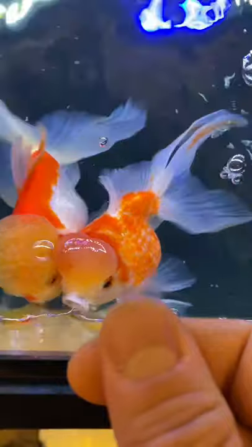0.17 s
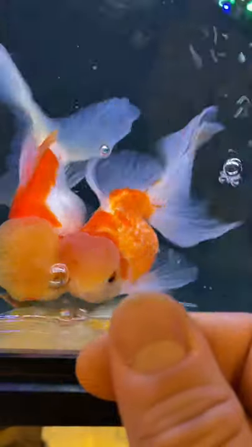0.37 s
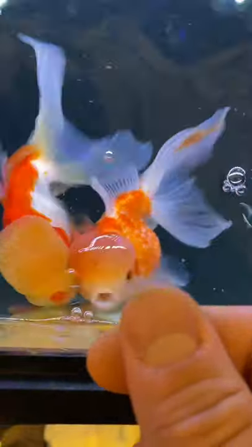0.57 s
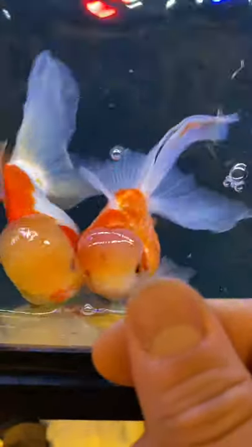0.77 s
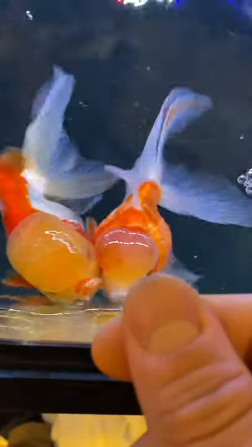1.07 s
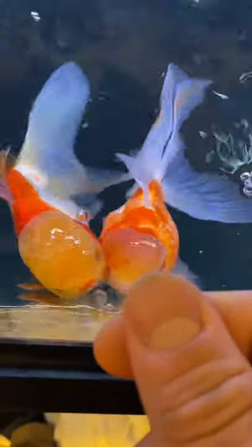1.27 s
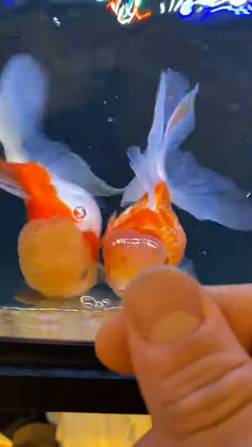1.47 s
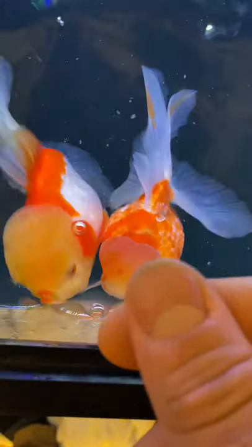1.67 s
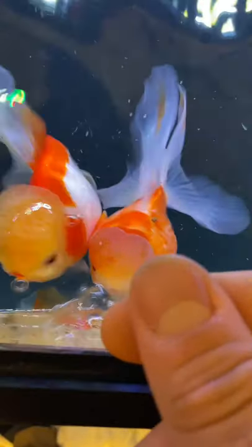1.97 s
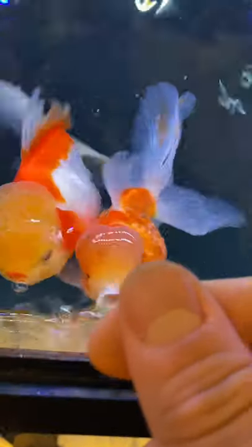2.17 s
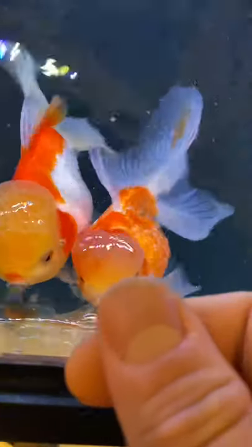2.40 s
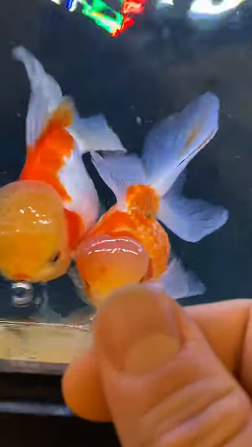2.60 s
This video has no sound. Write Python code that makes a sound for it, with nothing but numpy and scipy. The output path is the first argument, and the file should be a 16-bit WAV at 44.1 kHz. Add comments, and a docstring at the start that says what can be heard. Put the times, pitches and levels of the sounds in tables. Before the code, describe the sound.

Steady low throb of a fish tank pump, gently rushing water, tiny bubbles fizzing and popping

```python
"""A pump thumps thirty strokes a second and buzzes in its housing: an aquarium indoors.
Water runs back into the tank as a rush of noise and tiny bubbles; larger bubbles pop at the surface.
Thump and buzz are sums of stroke multiples, the rush is shaped noise, bubbles are short rising sines
and bursting films are noise ticks. Two microphones stand a few centimetres apart; the pops
reach the left one first."""
import sys
import numpy as np
from scipy import signal
from scipy.fft import rfft, irfft, next_fast_len
from scipy.io import wavfile

SR = 44100
rng = np.random.default_rng(int(sys.argv[2]) if len(sys.argv) > 2 else 0)


def transcribe(signal):
    """Save signal, clipped to [-1, 1], as a 16-bit WAV file at the path in sys.argv[1]."""
    frames = np.atleast_2d(signal).T
    limited = np.clip(frames, -1, 1)
    pcm = np.round(limited * 32767).astype(np.int16)
    wavfile.write(sys.argv[1], SR, pcm)


def boost(x):
    """Linear amplitude factor 10**(x/20) for a level x in decibels (scalar or array-like)."""
    u = np.asarray(x, float) / 20
    return 10 ** u


N = 120834

# multiples of the pump stroke: multiple, level_db (added to PUMP_DB)
PUMP_MULTIPLES = [(1, 2), (2, -2), (3, -7), (5, -13), (6, -28), (7, -25.5), (8, -40.5), (9, -10.5)]
# housing buzz at each microphone: multiple of the stroke, left_rms_db, right_rms_db
BUZZ_MULTIPLES = [(21, -63, -68), (28, -69, -72), (29, -68, -74), (30, -69, -78), (37, -67, -74),
                  (39, -62, -75), (43, -79, -68), (50, -72, -71), (51, -72, -72)]
# spectrum of the rumble and rush before it flickers: pitch_hz, level_db_per_hz
FLOW_SPECTRUM = [(25, -83), (45, -68.5), (75, -65), (105, -61.5), (135, -72), (195, -70), (255, -69.5),
                 (320, -82), (720, -82.5), (800, -90), (1600, -91), (3000, -92.5), (5300, -97.5),
                 (6500, -102.5), (8000, -101), (9500, -100)]
# share of the flow that is unrelated between the channels, held at 0 dB or less: pitch_hz, share_db
DIFFUSE_SHARE = [(30, -51), (250, -5.5), (1000, -5), (2000, -0.5), (4150, -27.5), (4300, -25), (5500, -35),
                 (5750, -5.5), (8200, 6), (8700, -29.5)]
# phase by which the right channel trails the left for flow and fizz; from 4.3 to 5.5 kHz
# the channels are opposite: pitch_hz, trail_rad
RIGHT_TRAIL = [(0, 0), (900, .3), (4150, 2.6), (4300, np.pi), (5500, np.pi), (5750, 3.7), (8800, 2 * np.pi)]
# treble contour, whose swing about its mean drives the fizz rate: time_s, level_db
TREBLE_CONTOUR = [(0.1, -65.5), (2.56, -64), (2.7, -70)]
# tiny bubbles: rate_per_s (before clumping), lowest_hz, highest_hz, level_db (faintest), size_spread_db
FIZZ_KINDS = [(50, 500, 2500, -59, 4.0), (170, 2500, 9500, -58, 5.0)]
# larger bubbles: start_s, peak_db, pitch_hz (at the start)
POP_EVENTS = [(.217, -43, 1140), (.243, -43, 4800), (.645, -39, 5300), (.6485, -38, 5300),
              (.6641, -41, 9350), (.7251, -44, 8960), (.736, -38, 1300), (.7375, -35, 750),
              (.741, -36, 920), (.7412, -39, 2200), (.743, -37, 1070), (.745, -42, 3600), (.756, -38, 6300),
              (.7575, -44, 3050), (.766, -44, 4300), (.820, -44, 2900), (.825, -38, 2900),
              (.862, -40, 3300), (1.128, -43, 1420), (1.1665, -47, 8610), (1.1877, -42, 8270),
              (1.199, -38, 570), (1.2449, -39, 6720), (1.514, -38, 2000), (1.514, -42, 3850),
              (1.661, -45, 2700), (1.661, -36, 1050), (1.661, -33, 1390), (1.6613, -42, 6720),
              (1.676, -42, 950), (1.7731, -42, 5680), (1.8015, -32, 480), (1.8289, -44, 7400),
              (1.907, -41, 2950), (1.907, -36, 2450), (1.9292, -38, 5680), (2.5134, -44, 8270)]
# soft low gurgles that ring longer: start_s, peak_db, pitch_hz (at the start)
GURGLE_EVENTS = [(.235, -36, 100), (.295, -48, 410), (.91, -48, 485)]
# films that burst with a broad tick: start_s, rms_db (before the decay), lowest_hz, highest_hz
TICK_EVENTS = [(.217, -37, 800, 2600), (.4652, -41, 5500, 9700), (.5578, -43, 3800, 5800),
               (.7555, -39, 3000, 8500), (.8245, -41, 2000, 4500), (1.380, -41, 6500, 9700),
               (1.4845, -40, 4200, 6300), (1.5145, -39, 1800, 7300), (1.9938, -34, 7000, 9700),
               (2.119, -42, 6500, 9700), (2.1325, -33, 3500, 6800), (2.3245, -42, 4500, 7500),
               (2.4724, -35, 4400, 6200), (2.5524, -38, 5000, 7500)]

STROKE_HZ, STROKE_S = 30, .0497   # pump rate; moment near which one stroke peaks
PUMP_DB, PUMP_WAVER_DB = -37.5, 0.5   # rms reference for the multiples; their slow waver
HUM_SPREAD_RAD = 0.0069   # left-right phase, times the multiple squared
LOW_LAG_RAD = .65   # the two lowest multiples trail the stroke
BUZZ_COMB_DB, BUZZ_WAVER_DB = -77.5, 1.8   # rms of each other multiple from 26 to 53; waver of all
PATCHY_DB, SHARED = 1.3, .6   # flicker of each flow band; weight of the flicker they have in common
RING_S_AT_1K, RING_FALLS = .0032, .55   # bubble decay time at 1 kHz; exponent of its fall with pitch
GURGLE_RING_S = .025
ATTACK_CYCLES = .5   # time constant of the swell, in cycles of the bubble
RISE = .012   # pitch climbs by twice this share in each decay time
CRACK_DB, CRACK_WIDTH = -12, 1.5   # a pop's own tick: level against the pop; ratio either side of its pitch
CRACK_S = .001   # decay time of every tick
FIZZ_CLUMP_DB = 5.0   # slow swing of the fizz rate
ROOM_T60_S, ROOM_DB = .08, -11   # decay; tail energy against the direct sound
POP_LAG_S = .000103   # pops reach the right microphone later
FADE_START_S, FADE_S = 0.035, 0.04
CUTOFF_HZ = 9720


def at_hz(points, hz):
    """Read a spectrum table on a log-frequency axis."""
    table_hz, table_db = np.transpose(points)
    return np.interp(np.log(np.maximum(hz, 1)), np.log(table_hz), table_db)


def drift(rate_hz):
    """Slow random wander with spread 1: noise smoothed by two equal poles, at one value per 40 samples."""
    pole = np.exp(-80 * np.pi * rate_hz / SR)
    noise = rng.standard_normal(N // 40 + 2002)
    slow = signal.lfilter([1], [1, -2 * pole, pole * pole], noise)[2000:]
    return np.interp(np.arange(N) / 40, np.arange(len(slow)), slow / slow.std())


def pair(x, lagged=False):
    """One sound in two channels: the right trails by a fixed lag or by the phase table."""
    size = next_fast_len(N + 512)
    hz = np.arange(size // 2 + 1) * SR / size
    trail_rad = 2 * np.pi * hz * POP_LAG_S if lagged else np.interp(hz, *np.transpose(RIGHT_TRAIL))
    right = irfft(rfft(x, size) * np.exp(-1j * trail_rad), size)[:N]
    return np.array([x, right])


def pump():
    """Each stroke is a pressure pulse: its multiples peak nearly together, the lowest two trailing."""
    stroke_phase = 2 * np.pi * STROKE_HZ * (np.arange(N) / SR - STROKE_S)
    side_rad = np.array([[-.5], [.5]]) * HUM_SPREAD_RAD
    out = np.zeros((2, N))
    for k, db in PUMP_MULTIPLES:
        level = np.sqrt(2) * boost(PUMP_DB + db + PUMP_WAVER_DB * drift(2.8))
        out += level * np.cos(k * stroke_phase + k * k * side_rad - LOW_LAG_RAD * (k < 3))
    return out


def buzz():
    """The housing sounds high stroke multiples, wavering, with a phase of their own at each microphone."""
    stroke_phase = 2 * np.pi * STROKE_HZ * np.arange(N) / SR
    named = [row[0] for row in BUZZ_MULTIPLES]
    rest = [(k, BUZZ_COMB_DB, BUZZ_COMB_DB) for k in range(26, 54) if k not in named]
    out = np.zeros((2, N))
    for k, left_db, right_db in list(BUZZ_MULTIPLES) + rest:
        level_db = np.array([[left_db], [right_db]]) + BUZZ_WAVER_DB * drift(0.65)
        phase = rng.uniform(0, 2 * np.pi, (2, 1))
        out += np.sqrt(2) * boost(level_db) * np.cos(k * stroke_phase + phase)
    return out


def flow():
    """Running water as direct and diffuse noise, in half-octave bands that flicker partly together."""
    size = next_fast_len(N)
    hz = np.arange(size // 2 + 1) * SR / size
    direct, left, right = rfft(rng.standard_normal((3, size)))
    diffuse = np.clip(boost(at_hz(DIFFUSE_SHARE, hz)), 0, 1)
    right_turn = np.exp(-1j * np.interp(hz, *np.transpose(RIGHT_TRAIL)))
    direct_pair = np.sqrt(1 - diffuse ** 2) * direct * np.array([np.ones_like(hz), right_turn])
    rush = direct_pair + diffuse * np.array([left, right])
    rush = rush * boost(at_hz(FLOW_SPECTRUM, hz)) * np.sqrt(SR / 2)
    half_octave = 2 * np.log2(np.maximum(hz, 1) / 25)
    together = drift(6.0)
    out = np.zeros((2, N))
    for k in range(19):
        # overlapping triangles, one per half octave from 25 Hz up
        band = irfft(rush * np.clip(1 - abs(half_octave - k), 0, 1), size)[:, :N]
        out += band * boost(PATCHY_DB * (SHARED * together + drift(15.0)))
    return out


def add_bubble(out, start_s, db, hz, ring_s=None):
    """A ringing bubble: a sine that swells fast, rises in pitch and dies."""
    ring_s = ring_s or RING_S_AT_1K * (hz / 1000) ** -RING_FALLS
    t = np.arange(int(5 * ring_s * SR)) / SR
    shape = (1 - np.exp(-t * hz / ATTACK_CYCLES)) * np.exp(-t / ring_s)
    tone = np.sin(2 * np.pi * hz * t * (1 + RISE * t / ring_s))
    i = int(start_s * SR)
    out[i:i + len(t)] += boost(db) * shape / shape.max() * tone


def fizz():
    """Tiny bubbles at random moments, pitches and sizes, crowding into clumps."""
    out = np.zeros(N + SR)
    treble_db = np.interp(np.arange(N) / SR, *np.transpose(TREBLE_CONTOUR))
    busy = boost(FIZZ_CLUMP_DB * drift(8.8) + 1.5 * (treble_db - treble_db.mean()))
    for rate, low_hz, high_hz, db, spread_db in FIZZ_KINDS:
        rows = rng.random((4000, 4))   # candidates: moment, chance, pitch, size
        chance = rate * N / SR / len(rows) * busy[(rows[:, 0] * N).astype(int)]
        for when, _, pitch, size in rows[rows[:, 1] < chance]:
            level_db = db + spread_db * min(-np.log(size + 1e-9), 2.5)
            add_bubble(out, when * N / SR, level_db, low_hz * (high_hz / low_hz) ** pitch)
    return out


def ticks():
    """Bursting films: brief band-passed noise, alone or at the opening of a pop."""
    out = np.zeros(N + SR)
    tears = rng.standard_normal((80, 400))
    decay = np.exp(-np.arange(400) / SR / CRACK_S)
    openings = [(s, db + CRACK_DB, hz / CRACK_WIDTH, hz * CRACK_WIDTH) for s, db, hz in POP_EVENTS]
    for (start_s, db, low_hz, high_hz), tear in zip(list(TICK_EVENTS) + openings, tears):
        band = signal.butter(2, [low_hz, high_hz], "band", fs=SR, output="sos")
        crack = signal.sosfilt(band, tear)
        i = int(start_s * SR)
        out[i:i + len(tear)] += boost(db) * crack / crack.std() * decay
    return out


def pops():
    """Larger bubbles ring at the surface, and low gurgles ring longer."""
    out = np.zeros(N + SR)
    for start_s, db, hz in POP_EVENTS:
        add_bubble(out, start_s, db, hz)
    for start_s, db, hz in GURGLE_EVENTS:
        add_bubble(out, start_s, db, hz, GURGLE_RING_S)
    return out


def room():
    """Direct sound, then a decaying noise tail of its own for each microphone."""
    t = np.arange(SR // 5) / SR
    tail = rng.standard_normal((2, len(t))) * boost(-60 * t / ROOM_T60_S) * (t > .0015)
    return boost(ROOM_DB) * tail / np.sqrt(np.sum(tail[0] ** 2)) + (t == 0)


def bubbles():
    """Pops and ticks share one lag and a stereo room; fizz gets one room tail, then the phase table."""
    surface = (pops() + ticks())[:N]
    tiny = fizz()
    response = room()
    surface_pair = signal.fftconvolve(pair(surface, lagged=True), response, axes=1)[:, :N]
    return surface_pair + pair(signal.fftconvolve(tiny, response[0])[:N])


def scene():
    """Pump, buzz, flow and bubbles."""
    return pump() + buzz() + flow() + bubbles()


def top_cut(x):
    """Nothing passes above the cut-off."""
    return signal.sosfilt(signal.butter(12, 10700, fs=SR, output="sos"), x)


def record(dry):
    """The sound fades in from silence and a steep low-pass cuts the top."""
    fade = np.clip((np.arange(N) / SR - FADE_START_S) / FADE_S, 0, 1)
    low_pass = signal.cheby2(20, 35, CUTOFF_HZ, fs=SR, output="sos")
    mix = signal.sosfilt(low_pass, dry * fade)
    return top_cut(mix)


dry = scene()
out = record(dry)
transcribe(out)
```